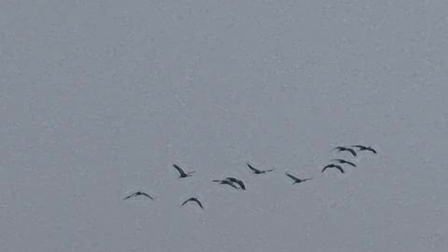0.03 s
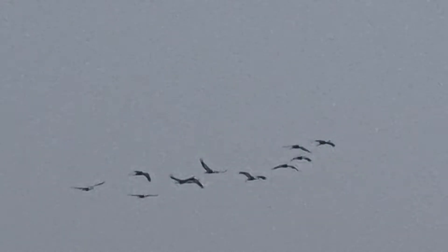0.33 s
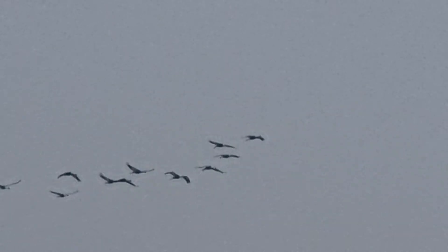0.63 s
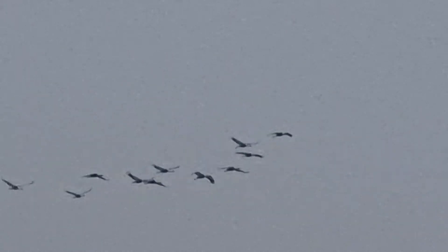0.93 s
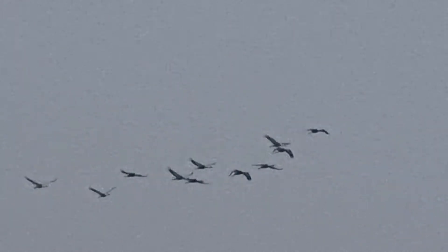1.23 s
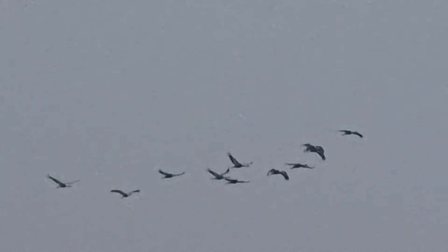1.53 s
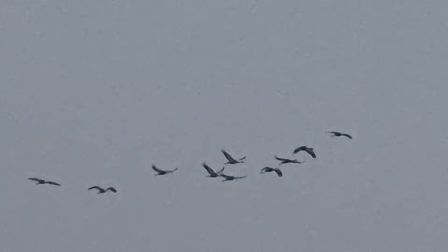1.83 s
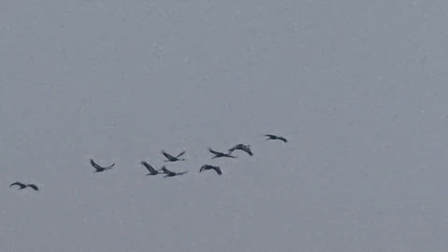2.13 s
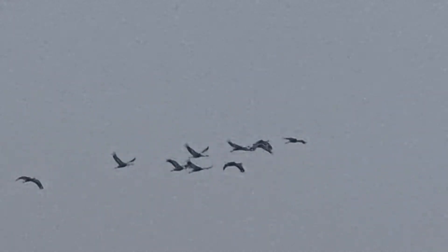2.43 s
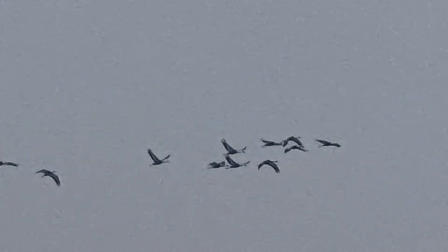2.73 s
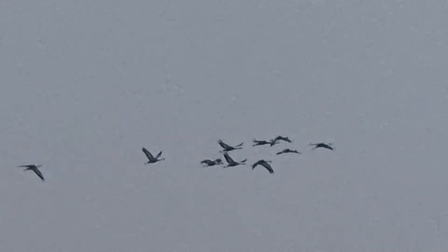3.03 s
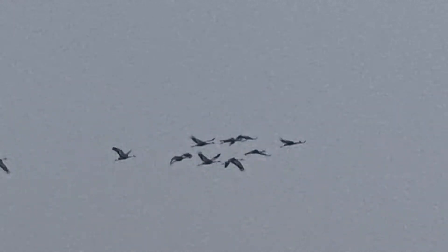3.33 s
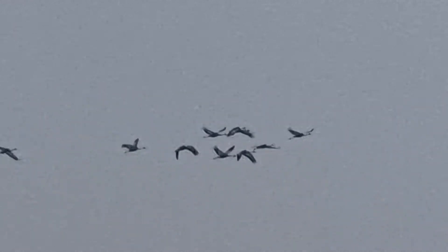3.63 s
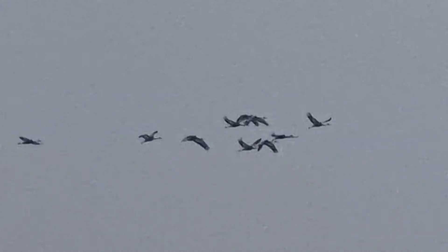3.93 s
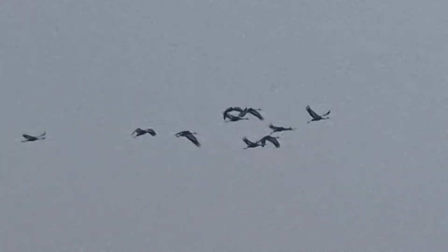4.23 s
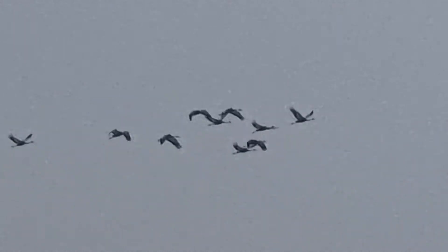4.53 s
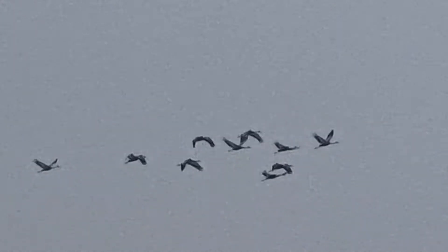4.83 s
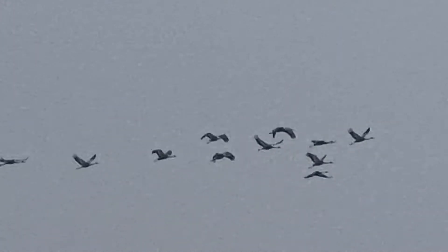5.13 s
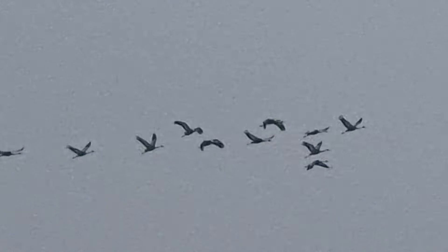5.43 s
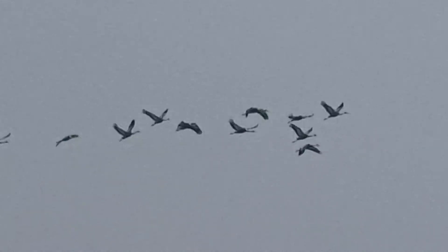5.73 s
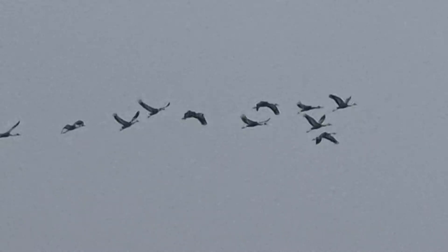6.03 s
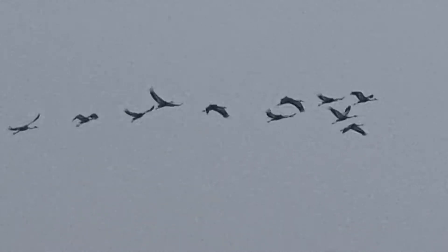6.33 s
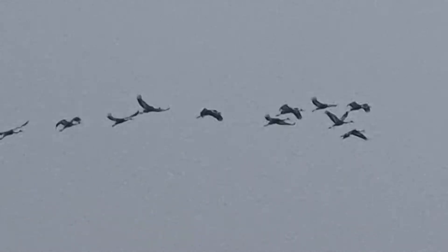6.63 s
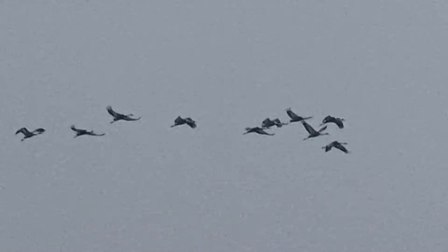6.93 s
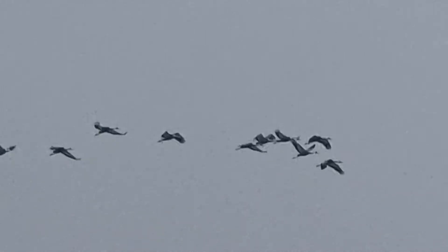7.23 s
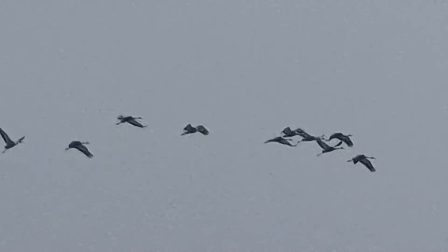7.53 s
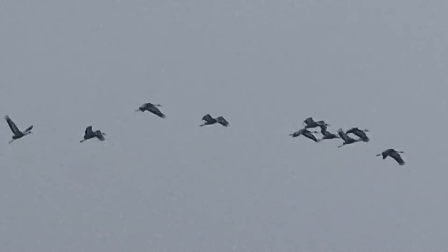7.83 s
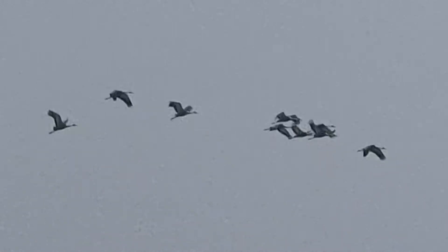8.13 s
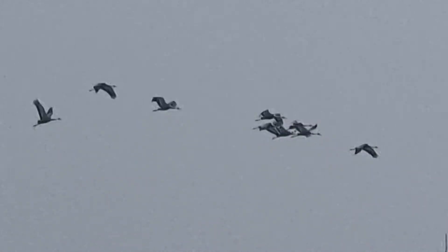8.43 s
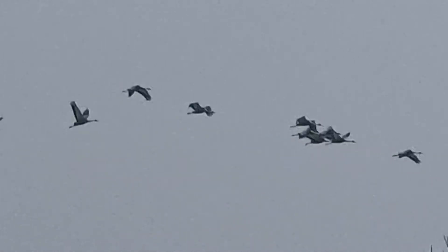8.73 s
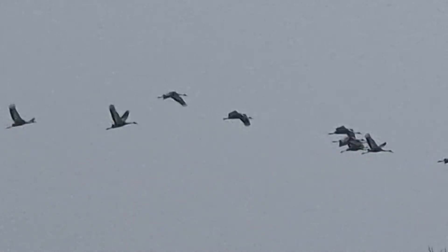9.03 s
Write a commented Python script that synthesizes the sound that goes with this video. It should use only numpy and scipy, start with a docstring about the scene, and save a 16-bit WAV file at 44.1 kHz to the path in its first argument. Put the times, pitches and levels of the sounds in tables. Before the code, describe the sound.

Cranes call overhead in open country, high rattles answered by low harsh ones, over distant yelps and light air.

```python
"""A faint, distant rattle opens a chorus of cranes flying over open country. A near pair calls in duet:
one gives a high rattle that ends in a held bugle note, the other answers with a low, harsh rattle.
Each rattle is a train of bursts from the syrinx, echoed in a long windpipe and filtered by the throat.
Farther birds whistle and rattle in between, a small bird chirps once, and light air rumbles at the
microphone."""
import sys
import numpy as np
from scipy import signal
from scipy.fft import rfft, irfft, next_fast_len
from scipy.io import wavfile
from scipy.ndimage import uniform_filter1d, minimum_filter1d, map_coordinates

SR = 44100
rng = np.random.default_rng(int(sys.argv[2]) if len(sys.argv) > 2 else 0)


def wav_record(signal):
    """Record a signal, one row per channel, as 16-bit PCM in the file named by sys.argv[1]."""
    frames = np.transpose(np.atleast_2d(signal))
    bounded = np.clip(frames, -1, 1)
    # unit amplitude maps onto the largest positive 16-bit level
    quanta = np.round(bounded * 32767).astype(np.int16)
    wavfile.write(sys.argv[1], SR, quanta)


N = 404838
TIME = np.arange(N) / SR


def gain_of(db):
    """Amplitude ratio of a level in decibels."""
    return 10 ** (np.asarray(db) / 20)


def unit_rms(x):
    """Normalisation to unit mean power."""
    return x / np.sqrt(np.mean(x ** 2) + 1e-20)


def colour(x, points):
    """Zero-phase filtering through (frequency [Hz], gain [dB]) points."""
    size = next_fast_len(x.shape[-1] + 512)
    hz, db = np.transpose(points)
    curve = np.interp(np.log(np.fft.rfftfreq(size, 1 / SR) + 1), np.log(hz), db)
    return irfft(rfft(x, size) * gain_of(curve), size)[..., :x.shape[-1]]


def wander(size, hz):
    """Random modulation with a bandwidth of about hz."""
    knots = rng.standard_normal(int(2 * hz * size / SR) + 2)
    return np.interp(np.arange(size) * 2 * hz / SR, np.arange(len(knots)), knots)


def add(mix, s, sound):
    """Superposition: a sound joins the mix at s seconds."""
    part = mix[max(round(s * SR), 0):][:len(sound)]
    part += sound[:len(part)]


def partials(hz, overtone_db, count=14, smear=0, uneven_db=0):
    """Harmonic series on a pitch curve; phase modulation (smear) broadens the overtones."""
    phase = 2 * np.pi * (np.cumsum(hz) / SR + rng.random())
    out, overtone = np.cos(phase), gain_of(overtone_db)
    for k in range(2, count + 1):
        drift = smear * np.sqrt(k - 1) * wander(len(hz), 400)
        strength = overtone ** min(np.log2(k) / 2, 1) * gain_of(uneven_db * rng.standard_normal())
        out = out + strength * np.cos(k * phase + drift) * (k * hz < SR / 2)
    return out


def burst(hz, length, treble_db, leap, droop, flutter, rough, settle_s,
          swell_s=.0014, sag=.17, smear=.15, end_db=-2, crack=0, crack_s=.012, count=14):
    """Self-oscillation in one opening of the syrinx: the pitch leaps, flutters, settles and droops."""
    t = np.arange(int((length + .00644) * SR)) / SR
    unrest = np.exp(-(t / settle_s) ** 2)
    shake = wander(len(t), 170) * unrest
    # the tone is low and dull while the syrinx opens and shuts
    slack = np.exp(-(t / swell_s) ** 4) + np.exp(-((t[-1] - t) / (2.5 * swell_s)) ** 4)
    arch = leap * np.exp(-((t - swell_s - .0035) / .004) ** 2) - sag * slack - droop * (t / length) ** 3
    pitch = hz * (1 + arch + flutter * shake + rough * (unrest + .1) * wander(len(t), 1131))
    trend_db = end_db * (t / length) ** 2
    bright_db = treble_db - 10 * slack + trend_db / 2  # a fading note also grows duller
    chaos = crack * np.exp(-(t / crack_s) ** 4)  # chaotic onset, before the tone locks
    tone = partials(pitch, bright_db, count, smear * (unrest ** 2 + .15) + 2 * chaos, uneven_db=2.2)
    rasp = (.1 * unrest + chaos) * gain_of(bright_db / 2) * rng.standard_normal(len(t)) * (1 + abs(tone))
    falter_db = 4.5 * np.minimum(shake, 0)  # the swing has a ceiling, so shaking only lowers it
    swing = gain_of(trend_db + falter_db) * (1 + .5 * chaos * np.exp(-t / crack_s))
    gate = np.clip(t / .001, 0, 1) * np.clip((t[-1] - .002 - t) / .003, 0, 1)
    return (tone + rasp) * swing * gate


def cry(length, mid_hz, glide, overtone_db, arch_octaves=.06):
    """Frequency and amplitude modulation: an arched, wavering note glides up or down."""
    u = np.linspace(-1, 1, int(length * SR))
    waver = .012 * wander(len(u), 45) + .012 * wander(len(u), 500)
    hz = mid_hz * 2 ** (glide * u / 2 - arch_octaves * u ** 2) * (1 + waver)
    tone = partials(hz, overtone_db, count=4, smear=.15, uneven_db=2)
    return tone * signal.windows.tukey(len(u), .5) * gain_of(3 * wander(len(u), 30))


def windpipe(x, trip_s, echo):
    """Comb filtering: the long coiled windpipe sends each burst round again, weaker on every trip."""
    return x + sum(echo ** k * np.interp(TIME - k * trip_s, TIME, x, left=0) for k in range(1, 5))


# Response of the right microphone port against the left: (frequency [Hz], gain [dB])
RIGHT_RESPONSE = [(800, -2), (1200, -4), (2100, -10), (2800, -5.5), (4200, -12.5), (5200, -3.5),
                  (7200, -7.5), (8500, -55.5)]

def ports(x, lag_ms):
    """Arrival-time difference: the duller right port receives the sound lag_ms after the left."""
    delayed = map_coordinates(x, [np.arange(N) - lag_ms * SR / 1000], order=3)
    return np.array([x, colour(delayed, RIGHT_RESPONSE)])


def open_air(x, t60):
    """Diffuse scattering from the ground and far trees, uncorrelated between the ports."""
    t = np.arange(SR // 2) / SR
    tail = rng.standard_normal((2, len(t))) * gain_of(-60 * t / t60) * np.clip(t / .015, 0, 1)
    wet = signal.fftconvolve(x[None], tail / np.linalg.norm(tail[0]), axes=1)[:, :N]
    return np.array([wet[0], colour(wet[1], RIGHT_RESPONSE)])


# Spectrum of the hiss: (frequency [Hz], relative density [dB])
HISS_SPECTRUM = [(60, 3.5), (130, -8.5), (280, -5), (450, -8), (900, -4), (3500, -13), (10000, -27),
                 (13000, -23.5)]
# Envelopes of the hiss and of the rumble: (time [s], level [dB])
HISS_LEVELS = [(1, -47), (1.42, -60.5), (1.7, -57), (8.15, -58.5), (8.4, -57)]
RUMBLE_LEVELS = [(1, -59), (1.45, -71.5), (1.8, -58.5), (3.3, -68), (6.12, -56), (6.4, -57.5), (9, -60)]

def air(puff_db=9.5, flicker_db=1):
    """Partly coherent noise at the two ports: light air hisses faintly and rumbles in puffs."""
    noise = rng.standard_normal((2, N)) + rng.standard_normal(N)
    rumble_db = np.interp(TIME, *np.transpose(RUMBLE_LEVELS)) + puff_db * np.tanh(wander(N, 8))
    hiss_db = np.interp(TIME, *np.transpose(HISS_LEVELS)) + flicker_db * wander(N, 13)
    rumble = unit_rms(colour(noise, [(45, 0), (200, -24), (900, -80)])) * gain_of(rumble_db)
    return unit_rms(colour(noise, HISS_SPECTRUM)) * gain_of(hiss_db) + rumble


# Dry clicks and soft thumps: (time [s], level [dB], spectral peak [Hz])
TRANSIENTS = [(0.967, -42, 116), (2.385, -39.5, 13000), (8.221, -33, 5640), (8.222, -39, 76.4)]

def ticks():
    """Exponential decay of noise bands: the lower the band, the longer it lasts."""
    out, t = np.zeros(N), np.arange(SR // 10) / SR
    for s, db, hz in TRANSIENTS:
        body = unit_rms(colour(rng.standard_normal(len(t)), [(hz / 5, -12), (hz, 0), (hz * 10, -40)]))
        add(out, s, gain_of(db) * body * np.exp(-t / (.0018 + 2 / hz)))
    return np.array([out, out])


# Throat resonances of all the distant cranes: (frequency [Hz], gain [dB])
FAR_FORMANTS = [(450, -30.5), (640, 3), (1500, -4.5), (2300, -3.5), (2750, -14), (3150, -4.5), (3500, -17),
                (4600, -7), (6500, -18.5), (8000, -11), (10000, -47)]
# Envelope of the flock's chatter: (time [s], level [dB])
CHATTER_LEVELS = [(.2, -44), (.5, -32), (1.2, -62.5), (1.48, -65.5), (1.62, -43), (2.06, -33.5),
                  (2.4, -38.5), (3.65, -41), (4.3, -53), (4.55, -27.5), (4.72, -43.5), (5.5, -39.5),
                  (6.12, -34), (6.4, -43.5), (6.6, -40), (7, -53), (7.56, -41.5), (7.9, -61), (9.1, -40.5)]

def flock(birds=130, repeats=5):
    """Incoherent summation: yelps and croaks of many faint birds blend into a chatter."""
    out = np.zeros(N)
    for pitch, span, fall in rng.random((birds, 3)):
        hz = 780 + 1350 * (pitch + rng.random()) / 2
        yelp = cry(.025 + .055 * span, hz, glide=.15 - .4 * fall, overtone_db=-16)
        croak = gain_of(-8) * burst(hz * (.5 + fall), length=.02, treble_db=-13, leap=.04, droop=.04,
                                    flutter=.06, rough=.1, settle_s=.05, count=4)
        for yelp_s, croak_s in rng.uniform(0, N / SR, (repeats, 2)):
            add(out, yelp_s, yelp)
            add(out, croak_s, croak)
    return unit_rms(colour(out, FAR_FORMANTS)) * gain_of(np.interp(TIME, *np.transpose(CHATTER_LEVELS)))


def nasal_note(s=2.195, length=.29, hz=314, db=-39, sag=.011, waver=.0031):
    """Formant filtering suppresses the fundamental of one far, sinking call, leaving it thin and nasal."""
    u, out = np.linspace(-1, 1, int(length * SR)), np.zeros(N)
    voice = partials(hz * (1 - sag * u + waver * wander(len(u), 30)), 0, count=11, smear=.2)
    formants = [(450, -40), (1000, -8), (1850, 0), (2180, -14), (2500, 1), (3100, -3), (3500, -18)]
    add(out, s, gain_of(db) * unit_rms(colour(voice, formants)) * signal.windows.tukey(len(u), .5))
    return out


# Far, raspy chirps: (time [s], level [dB])
HOARSE_CHIRPS = [(3.557, -38), (6.59, -40), (7.561, -40), (8.595, -40)]

def rasps(length=.062, top_hz=3700, fall=.35, rough=.066):
    """Fast random frequency modulation makes a falling tone hoarse."""
    u, out = np.linspace(0, 1, int(length * SR)), np.zeros(N)
    for s, db in HOARSE_CHIRPS:
        hz = top_hz * (1 - fall * u + rough * wander(len(u), 690))
        add(out, s, gain_of(db) * partials(hz, 0, count=1) * signal.windows.tukey(len(u), .5))
    return out


def small_bird(s=6.347, length=.055, top_hz=7900, db=-31):
    """A swept sinusoid: one thin chirp leaps up, sags a little and drops."""
    u, out = np.linspace(-1, 1, int(length * SR)), np.zeros(N)
    hz = top_hz * (1 - .082 * u - .52 * u ** 4)
    add(out, s, gain_of(db) * np.sin(2 * np.pi * np.cumsum(hz) / SR) * signal.windows.tukey(len(u), .4))
    return np.array([out, .67 * out]) + gain_of(-6) * open_air(out, t60=.4)


# Clear cries: (time [s], length [s], relative level [dB], mid pitch [Hz], glide [oct], overtones [dB])
DISTANT_CRIES = [(1.538, 0.041, -45, 1135, .08, -20), (1.733, .105, -35.5, 1468, -.08, -16.5),
                 (1.849, .09, -37, 1570, -0.36, -17.5), (2.317, .03, -39.5, 1454, .05, -16),
                 (2.389, .1, -36.5, 1562, 0.13, -18.5), (3.324, .05, -34, 1523, -.1, -31),
                 (3.36, 0.061, -37.5, 1134, -.05, -31), (3.398, 0.33, -47.5, 787, -.2, -25),
                 (3.524, .12, -41.5, 1517, -.25, -20.5), (3.642, 0.043, -35.5, 1347, 0.42, -35),
                 (3.923, 0.039, -36, 1137, 0.144, -34), (3.96, 0.051, -42.5, 1570, .05, -11),
                 (4.061, 0.12, -40, 1184, -0.46, -44), (4.112, .35, -53.5, 794, -0.15, -38),
                 (4.711, 0.037, -33.5, 1426, .3, -28), (4.814, 0.089, -42, 2140, -0.056, -24),
                 (5.51, 0.09, -46, 1524, -.18, -23), (5.562, .11, -47, 853, -0.083, -22),
                 (5.912, .07, -44.5, 1793, -0.44, -36), (6.045, 0.15, -43, 1362, -.31, -24),
                 (6.065, 0.064, -35.5, 1595, .15, -24), (6.334, 0.037, -40, 1480, -0.017, -35),
                 (6.403, 0.063, -47, 1096, -.03, -40), (6.683, 0.11, -43.5, 1835, -.15, -33),
                 (7.426, .14, -39.5, 1241, -0.23, -10.5), (7.473, .2, -49, 827, -.09, -32),
                 (7.658, 0.11, -41, 1476, -.35, -52), (7.751, 0.059, -37.5, 1097, -0.056, -55),
                 (7.869, 0.15, -44.5, 1537, -0.42, -40), (8.922, 0.064, -46, 2187, -0.014, -20)]
# Rattles: (time [s], bursts [count], period [s], level [dB], pitch [Hz], treble [dB], roughness [0-1])
DISTANT_RATTLES = [(.108, 4, 0.034, -29, 754, -33, 0.2), (1.603, 2, 0.04, -36, 808, -7.5, 0),
                   (2.032, 3, 0.019, -27, 701, -10, 0.3), (2.49, 2, 0.03, -28, 843, -21.5, 0),
                   (3.046, 2, 0.041, -14.5, 846, -31, 0.03), (3.79, 4, 0.041, -20.5, 762, -52, 0.12),
                   (3.99, 4, .044, -27.5, 912, -35, 0.1), (4.449, 5, 0.041, -24, 1293, -15, 0),
                   (6.505, 3, .044, -14.5, 874, -35, 0.01), (8.91, 3, 0.05, -34, 723, -6, 0)]

def far_cranes(sag_per_burst=.018):
    """Source and filter: single cries and sinking rattles pass through windpipe and throat."""
    out = np.zeros(N)
    for s, length, db, hz, glide, overtone_db in DISTANT_CRIES:
        add(out, s, gain_of(db + 13) * cry(length, hz, glide, overtone_db))
    for s, count, period, db, hz, treble_db, rough in DISTANT_RATTLES:
        for k in range(count):
            sound = burst(hz * (1 - sag_per_burst * k), .02, treble_db, leap=.042, droop=.046,
                          flutter=.07, rough=rough, settle_s=.024, end_db=-7.5)
            add(out, s + k * period, gain_of(db) * sound)
    return colour(windpipe(out, trip_s=.002935, echo=.3), FAR_FORMANTS)


def high_call(s, count, db, hz, opening_hz, last_s, treble_db, period_s=.041, quicken_s=.0022):
    """An accelerating pulse train: yields (time [s], level [dB], pitch [Hz], length [s], treble [dB])."""
    yield s - .037, db - 3.5 + .17 * treble_db, opening_hz, .019, treble_db / 2 - 7  # soft opening
    for k in range(count):
        slack = (k - 1.4) ** 2  # level and pitch follow one arch of effort
        onset = s + k * period_s - quicken_s * k ** 2
        length = last_s if k == count - 1 else .021
        yield onset, db - .9 * slack, hz * (1 - .015 * slack), length, treble_db


# Throat resonances of the high voice: (frequency [Hz], gain [dB])
HIGH_FORMANTS = [(450, -38), (780, -1.5), (1200, -3), (1900, -15), (2450, -7.5), (2950, -23.5),
                 (3850, -10.5), (4500, -13.5), (5600, -22), (7200, -19.5), (8600, -31), (10500, -62)]
# Its calls: (first full burst [s], full bursts [count], relative level [dB], top pitch [Hz],
# opening pitch [Hz], last burst's length [s], treble [dB], roughness [0-1])
HIGH_RATTLES = [(0.32, 4, -18.5, 1227, 870, 0.038, -7, 0), (1.009, 3, -15, 1239, 1046, 0.067, -11, 0.03),
                (2.576, 4, -12.5, 1205, 865, 0.026, -7.5, 0.05),
                (3.215, 3, -12.5, 1226, 1068, 0.071, -4, 0), (4.921, 3, -15, 1148, 854, 0.056, 5.5, 0.08),
                (6.821, 3, -15, 1178, 854, .048, 7, 0.07), (8.266, 4, -15.5, 1114, 958, 0.042, -6, 0.36),
                (9.094, 3, -16.5, 1188, 1004, 0.016, -8, 0.09)]

def high_crane():
    """Onset transients die away: short bursts stay unsteady, while a held one rings clean."""
    out = np.zeros(N)
    for *call, rough in HIGH_RATTLES:
        for s, db, hz, length, treble_db in high_call(*call):
            strain = np.interp(hz, [880, 1130], [.25, 1])  # low bursts are steadier and swell more slowly
            sound = burst(hz, length, treble_db, leap=.11 * strain, droop=.064 * strain,
                          flutter=.042 * strain, rough=rough * strain, settle_s=.041, swell_s=.004,
                          sag=.16 * strain, smear=.55 * strain, end_db=-2800 * length ** 2)
            attack = 1 - np.exp(-TIME[:len(sound)] * strain / .0007)
            add(out, s, gain_of(db + 4.5) * sound * attack)
    return colour(windpipe(out, trip_s=.006, echo=.33), HIGH_FORMANTS)


def low_call(s, db, hz, treble_db, brighten_db, last_db, count=5, period_s=.0485, grunt_hz=684):
    """A periodic pulse train after a soft grunt: yields (time [s], level [dB], pitch [Hz], treble [dB])."""
    yield s - .04, db - 10, grunt_hz, treble_db - 2
    for k in range(count):
        slack = (k - 1.5) ** 2  # level and pitch follow one arch of effort
        burst_db = db - .4 * slack + last_db * (k == count - 1)
        yield s + k * period_s, burst_db, hz * (1 - .02 * slack), treble_db + brighten_db * (k - 2)


# Throat resonances of the low voice: (frequency [Hz], gain [dB])
LOW_FORMANTS = [(470, -22), (620, 4.5), (850, 6.5), (1150, -2.5), (1650, -11.5), (1980, -9.5), (2330, -7),
                (2950, -23), (3450, -9), (4350, -8), (5200, -20.5), (5850, -16.5), (6550, -30),
                (7400, -24.5), (8200, -29), (10000, -60.5)]
# Its calls: (first full burst [s], relative level [dB], top pitch [Hz], treble [dB],
# brightening [dB/burst], last burst's gain [dB])
LOW_RATTLES = [(0.567, -10.5, 854, -2, -.5, -2.5), (2.817, -7, 846, -3, 0.5, -4),
               (5.158, -7.5, 837, 1, 1, -1), (7.103, -7.5, 838.7, -7, 0.5, -4),
               (8.666, -10, 837, -3.5, 2.5, -7.5)]

def low_crane(pitch_spread=.008, shimmer_db=.7, crack_spread_db=2.8):
    """Nonlinear oscillation: about twenty bursts a second crack open chaotically, then lock into a tone."""
    out = np.zeros(N)
    for call in LOW_RATTLES:
        for s, db, hz, treble_db in low_call(*call):
            jitter, shimmer, harshness = rng.standard_normal(3)
            flutter = np.interp(db, [-14, -7], [.11, .03])  # weakly blown bursts flutter more
            sound = burst(hz * (1 + pitch_spread * jitter), .0213, treble_db,
                          leap=.07 * gain_of(crack_spread_db * jitter), droop=.025, flutter=flutter,
                          rough=.03, settle_s=.034, end_db=1,
                          crack=.28 * gain_of(crack_spread_db * harshness))
            sound *= gain_of(db - 4 + shimmer_db * shimmer)
            add(out, s, sound)
            add(out, s - .005, .16 * sound[:300])  # the membranes stir just before they open
    return colour(windpipe(out, trip_s=.0068, echo=.24), LOW_FORMANTS)


def scene(start_s=.103):
    """Localisation by time difference: the near pair drifts leftwards, the flock lies to the right."""
    pair = low_crane() + high_crane()
    far = far_cranes() + nasal_note() + rasps()
    chatter = flock()
    near = ports(pair, lag_ms=np.interp(TIME, [0, 9], [.05, .135]))
    near += gain_of(-14.5) * open_air(pair, t60=.11)
    distant = ports(far + chatter, lag_ms=-.13) * gain_of([[1], [-2]])
    distant += gain_of(-8.5) * open_air(far, t60=.23) + gain_of(-13) * open_air(chatter, t60=.075)
    return (near + distant + small_bird() + air() + ticks()) * (TIME > start_s)


def record(dry, ceiling=.92, cutoff_hz=15900):
    """Peak limiting holds down the loudest bursts; a low-pass filter then limits the bandwidth."""
    allowed_gain = ceiling / np.maximum(abs(dry).max(0), ceiling)
    gain = uniform_filter1d(minimum_filter1d(allowed_gain, size=301), size=301)
    lowpass = signal.firwin(511, cutoff_hz, window=("kaiser", 9), fs=SR)
    return signal.oaconvolve(dry * gain, lowpass[None], "same")


dry = scene()
out = record(dry)
wav_record(out)
```